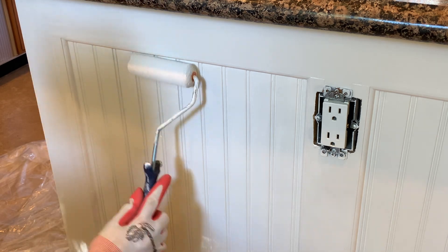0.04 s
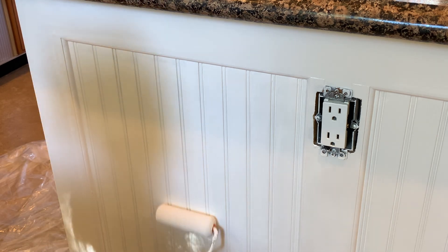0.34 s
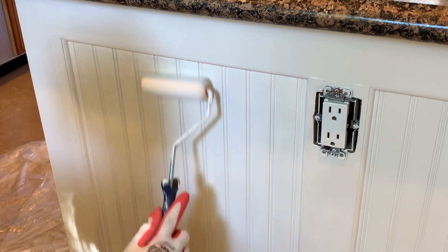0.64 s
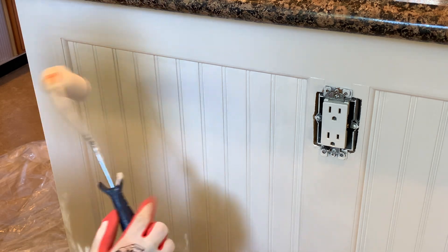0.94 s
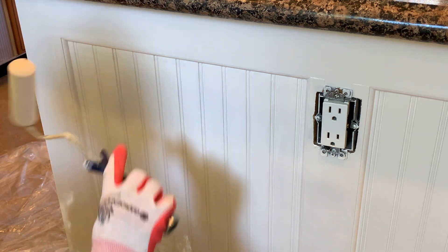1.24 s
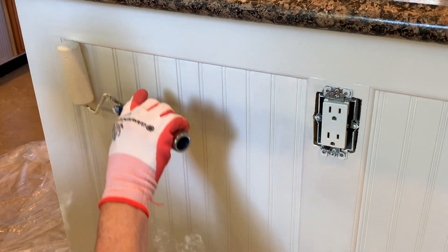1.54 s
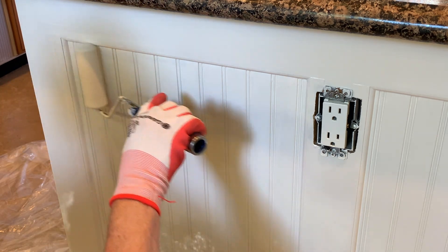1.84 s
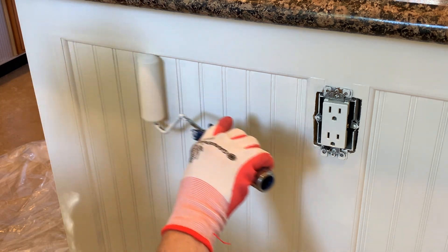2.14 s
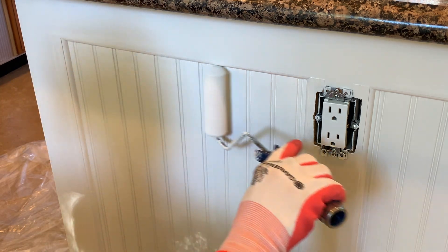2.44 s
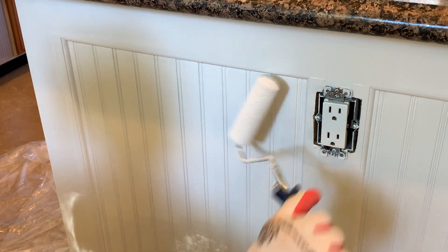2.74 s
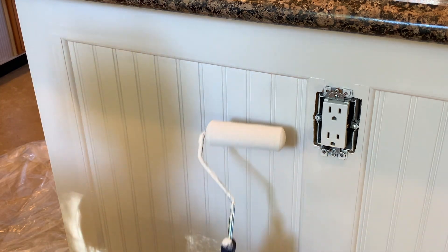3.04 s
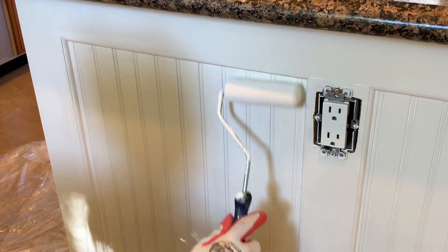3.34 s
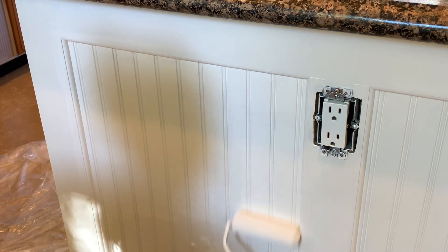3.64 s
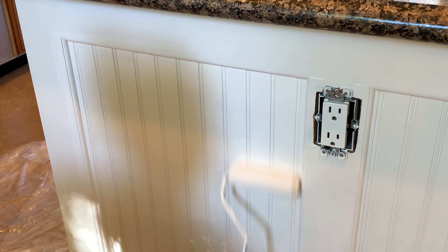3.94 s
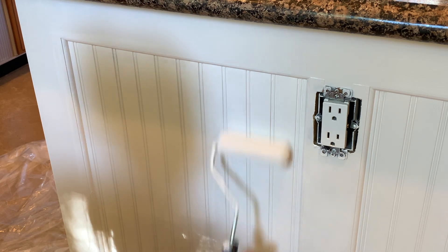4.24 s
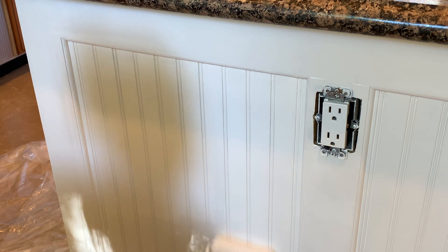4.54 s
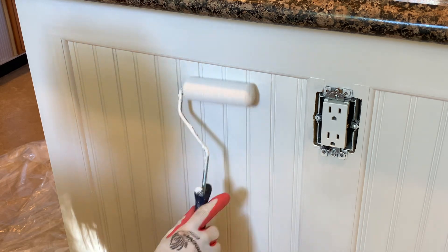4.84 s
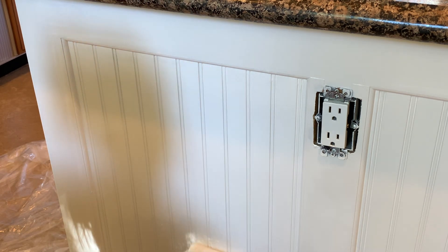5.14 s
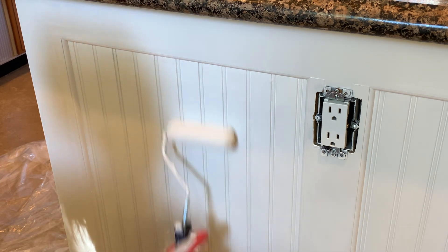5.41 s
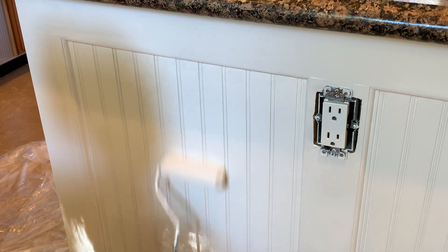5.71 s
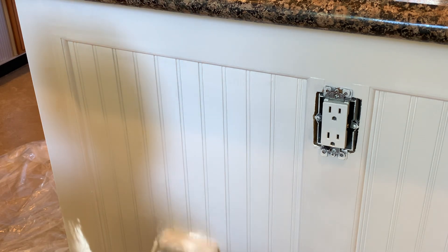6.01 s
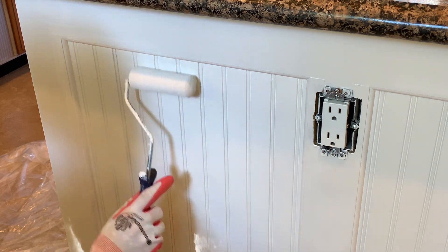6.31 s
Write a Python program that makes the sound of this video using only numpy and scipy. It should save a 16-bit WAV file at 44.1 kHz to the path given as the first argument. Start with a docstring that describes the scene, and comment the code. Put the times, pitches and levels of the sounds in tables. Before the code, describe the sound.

A small paint roller makes a few quick strokes on a wooden panel, the wet paint giving a dense sticky crackle while the hollow wood drums underneath. Lighter, quieter passes follow, with ticks and rubbing from the wire holder and small handle knocks. Then full strokes return in a steady back and forth rhythm. An appliance hums in the room, and the microphone is close.

```python
"""A small paint roller runs up and down a wooden wall panel, makes a few light sideways passes, rolls on.
Threads of wet paint snap behind the nap as a dense sticky crackle. The uneven sleeve drums the hollow
panel, and ticks and rubs on its wire frame; the handle knocks. An appliance hums in the room.
A phone with two ports listens from close by."""
import sys
import numpy as np
from scipy import signal
from scipy.fft import rfft, irfft, next_fast_len
from scipy.io import wavfile
from scipy.ndimage import uniform_filter1d

SR = 44100
rng = np.random.default_rng(int(sys.argv[2]) if len(sys.argv) > 2 else 0)


def transcribe(signal):
    """Save signal, clipped to [-1, 1], as a 16-bit WAV file at the path in sys.argv[1]."""
    frames = np.atleast_2d(signal).T
    limited = np.clip(frames, -1, 1)
    pcm = np.round(limited * 32767).astype(np.int16)
    wavfile.write(sys.argv[1], SR, pcm)


N = 289737
TIME_S = np.arange(N) / SR
FFT_SIZE = next_fast_len(N + SR // 2, True)
FREQS_HZ = np.maximum(np.arange(FFT_SIZE // 2 + 1) * SR / FFT_SIZE, 1)
SIDES = np.array([[1], [-1]])  # left, right

# hollow panel, low and high modes: (frequency [Hz], width [Hz], gain [dB])
BOOM_MODES = [(79.7, 7, -0.5), (98.2, 13, -8.5)]
KNOCK_MODES = [(128.7, 29, -0.5), (172.3, 15.3, -0.5), (207, 18.3, 0.5), (240, 24, -1.5), (306.4, 17, 3),
               (347.6, 24.4, -1), (381.7, 17.4, 2), (580, 128, -11.5)]


def undb(db):
    """Decibels to gain."""
    return 10 ** (np.asarray(db) / 20)


def unit(x):
    """Scale to rms 1."""
    return x / np.sqrt(np.mean(x ** 2))


def over_pitch(table):
    """Table columns interpolated over log frequency."""
    hz, *columns = np.transpose(table)
    return [np.interp(np.log(FREQS_HZ), np.log(np.sort(hz)), c) for c in columns]


def shape(x, response):
    """Filter by a frequency response."""
    return irfft(rfft(x, FFT_SIZE) * response, FFT_SIZE)[..., :N]


def colour(x, spectrum):
    """Filter by a spectrum table; rms 1."""
    return unit(shape(x, undb(over_pitch(spectrum)[0])))


def resonance(hz, width_hz):
    """Response of one damped mode, gain 1 at its centre."""
    return 1 / (1 + 1j * (FREQS_HZ ** 2 - hz ** 2) / (FREQS_HZ * width_hz))


def ring(x, modes):
    """Drive modes of alternating sign."""
    return shape(x, sum((-1) ** k * undb(db) * resonance(hz, width_hz)
                        for k, (hz, width_hz, db) in enumerate(modes)))


def walk(rate_hz):
    """Smooth random drift, rms 1."""
    return unit(shape(rng.standard_normal(N), np.exp(-(FREQS_HZ / rate_hz) ** 2)))


def pops(per_s, spread_db):
    """Random impulses of uneven size; rms 1 at any rate."""
    chance = np.clip(per_s / SR, 1e-4, 1)
    size = undb(spread_db * np.minimum(rng.exponential(size=N), 5))
    return unit((rng.random(N) < chance) * size * rng.choice([-1, 1], N) / np.sqrt(chance))


def sustain(x, window_s):
    """Hold a ringing near rms 1, as under steady drive."""
    return x / np.sqrt(uniform_filter1d(x ** 2, int(window_s * SR)) + 1e-9)


def level_db(power, rest_db):
    """Level of a power added to a resting level."""
    return 10 * np.log10(power + undb(rest_db) ** 2)


def stroke_power(starts_s, ends_s, levels_db, exponent, skew=0.93, reversal_s=0.044):
    """Sound power over strokes: speed is a skewed half sine; the sleeve slips on through each reversal."""
    power = np.zeros(N)
    for start_s, end_s, db in zip(starts_s, ends_s, levels_db):
        travel = np.clip((TIME_S - start_s) / (end_s - start_s), 0, 1) ** skew
        speed = np.abs(np.sin(np.pi * travel))
        power += (undb(db) * speed ** exponent) ** 2
    return np.abs(uniform_filter1d(power, int(reversal_s * SR)))


def appliance(mains_hz=118.7, mains_db=-32):
    """Mains tone and wavering motor drones over a dull rush of air."""
    # motor drones: (frequency [Hz], width [Hz], rms level [dB])
    drones = [(107.3, 3.7, -39), (64.5, 2.7, -39), (176.9, 6.6, -38.5), (206.8, 11, -39.5),
              (250.5, 11.4, -45), (364.1, 11.8, -42.5), (492, 10, -54.5), (678, 12, -56)]
    # air rush: (frequency [Hz], gain [dB])
    air_spectrum = [(25, -20), (45, -9), (75, -0.5), (140, -1.5), (195, 3.5), (275, -6.5), (370, -7),
                    (450, -13.5), (700, -19), (1050, -19.5), (1800, -39), (4000, -41), (9000, -50),
                    (16000, -78)]
    mains = np.sqrt(2) * undb(mains_db + 0.54 * walk(1.4)) * np.sin(2 * np.pi * mains_hz * TIME_S)
    motor = sum(undb(db) * unit(shape(rng.standard_normal(N), resonance(hz, width_hz) ** 2))
                for hz, width_hz, db in drones)
    mid, side = (colour(rng.standard_normal(N), air_spectrum) for _ in range(2))
    side = shape(side, np.minimum(0.14 + FREQS_HZ / 1300, .8))
    return mains + motor + undb(-31 + 0.58 * walk(8.7)) * (mid + side * SIDES)


def room(x, t60_s=0.44, near_s=0.0046, far_db=-21, places=9):
    """Direct sound bends round the phone to each port; reflections change as the roller travels."""
    # (frequency [Hz], left phase lead [rad], left minus right [dB], reflected to direct [dB])
    ports = [(100, 0, 0, -15.5), (346, -0.15, -1.5, -9.5), (970, 0.5, 2.5, -2), (2200, 0.5, 2, -2.5),
             (3170, 1.84, 1.5, 0), (4320, .5, -0.5, -3), (5410, 3.5, -3, 3.5), (7320, -0.5, -2, -10.5),
             (8100, -0.5, 2.2, -4), (9630, -2.5, -1.5, -7), (10160, -3, -2, -39), (11630, -4, 2, -38),
             (11630, -4, -1.5, -5), (12900, -6, -0.5, -12), (15700, -5.5, 1, -24)]
    lead_rad, pan_db, wet_db = over_pitch(ports)
    wet = undb(wet_db)
    port_gain = undb(SIDES * pan_db / 2) / np.sqrt(1 + wet ** 2)
    out = shape(x, port_gain * np.exp(.5j * SIDES * lead_rad))
    t = TIME_S[:SR // 3]
    decay = (np.exp(-t / near_s) + undb(far_db) * undb(-60 * t / t60_s)) * (t > .001)
    # one echo pattern per place on the panel, crossfaded at random
    weights = np.array([walk(8.3) for _ in range(places)])
    for share in weights / np.linalg.norm(weights, axis=0):
        echoes = rfft(rng.standard_normal((2, len(t))) * decay / np.linalg.norm(decay), FFT_SIZE)
        out += shape(x * share, port_gain * wet * echoes)
    return out


def cracks(events, decay_s, rattle_db, rattle_s, q, gain_db):
    """Noise bursts with a short rattle, each ringing at its own pitch."""
    out, t = np.zeros(N + SR), TIME_S[:SR // 8]
    envelope = np.exp(-t / decay_s) + undb(rattle_db) * np.exp(-t / rattle_s)
    for time_s, db, hz in events:
        burst = rng.standard_normal(len(t)) * envelope
        crack = signal.lfilter(*signal.iirpeak(hz, q, fs=SR), burst)
        start = int(time_s * SR)
        out[start:start + len(t)] += undb(db + gain_db) * crack / np.abs(crack).max()
    return out[:N]


def wire_frame():
    """The frame rings as the sleeve rubs unevenly on it; the sleeve ticks, the handle knocks."""
    # wire modes: (frequency [Hz], width [Hz], gain [dB])
    wire_modes = [(1270, 120, -1), (1600, 280, -3), (1970, 160, -6.5), (2790, 150, 2)]
    # axle rub, roller on its side: (start [s], end [s], level [dB])
    axle_rubs = [(.97, 1.34, -44), (1.98, 2.82, -41.5)]
    # sleeve hits frame, or a big blob lets go: (time [s], relative peak [dB], ring [Hz])
    sleeve_ticks = [(0.1935, -26, 8100), (1.046, -12.5, 7800), (1.053, -12.5, 8470), (1.1752, -20, 7920),
                    (1.281, -18, 8350), (1.6995, -33, 7600), (1.7938, -35, 8600), (2.158, -24, 8170),
                    (2.1654, -20, 8420), (2.6723, -21, 8460), (2.69, -13.5, 7700), (3.3373, -22.5, 6800),
                    (3.3837, -28, 6830), (3.4371, -25, 7140), (4.4574, -3, 8250), (5.1502, -2, 7150),
                    (5.3123, -16, 7930)]
    # roller lifts, lands or is regripped: (time [s], relative peak [dB], ring [Hz])
    handle_knocks = [(0.7991, -18.5, 1730), (0.9838, -34, 1080), (1.0024, -21.5, 2620), (1.1042, -21, 1300),
                     (1.1258, -16.5, 2720), (1.1787, -13.5, 3130), (2.8208, -30, 902),
                     (2.9434, -30.5, 1050), (3.05, -37, 1050)]
    rub_gain = np.sqrt(stroke_power(*np.transpose(axle_rubs), exponent=.4))
    rub = unit(ring(pops(2000, spread_db=0.5), wire_modes)) * rub_gain * undb(3.2 * walk(12))
    ticks = cracks(sleeve_ticks, decay_s=0.001, rattle_db=-11, rattle_s=0.018, q=2.8, gain_db=5.5)
    knocks = cracks(handle_knocks, decay_s=0.0021, rattle_db=-8, rattle_s=0.017, q=1.9, gain_db=3.5)
    return rub + ticks + knocks


def bumps(push_s=0.0017, gain_db=-8):
    """The sleeve crosses a groove or lump and thuds softly on the panel."""
    # (time [s], relative peak [dB])
    crossings = [(0.419, -7), (0.619, -10), (2.19, -24), (2.304, -15), (2.504, -16), (2.746, -14),
                 (3.561, -20), (5.16, -9), (5.881, -4)]
    push = np.exp(-((TIME_S - .004) / push_s) ** 2)
    thud = ring(push, BOOM_MODES + KNOCK_MODES)
    thud /= np.abs(thud).max()
    out = np.zeros(N)
    for time_s, db in crossings:
        start = int(time_s * SR)
        out[start:] += undb(db + gain_db) * thud[:N - start]
    return out


def swell_power(sigma_s=0.029):
    """Extra boom as the heavy side of the sleeve comes round."""
    # (time [s], level [dB])
    swells = [(.34, -16.5), (.435, -16), (.485, -19), (.625, -16), (.715, -16.5), (2.21, -23),
              (2.325, -18.5), (2.515, -21), (2.755, -20), (3.58, -17), (3.65, -20.5), (4.04, -21),
              (4.41, -21), (4.48, -18.5), (4.565, -23), (4.695, -23), (4.785, -16), (5.11, -17),
              (5.185, -13.5), (5.28, -25)]
    return sum((undb(db) * np.exp(-((TIME_S - time_s) / sigma_s) ** 2 / 2)) ** 2 for time_s, db in swells)


def contact(db, loose_db):
    """Vibration gain; falls steeply once the sleeve barely touches."""
    return undb(db) / np.sqrt(1 + undb(loose_db - db) ** 4)


def panel(boom_db, knock_db):
    """The lumpy sleeve shakes the panel: low modes boom, higher ones knock hollowly."""
    radiation = 1 / (1 + (57 / FREQS_HZ) ** 6)  # poor below the lowest mode
    boom = sustain(shape(ring(rng.standard_normal(N), BOOM_MODES), radiation), window_s=0.052)
    drum = sustain(ring(pops(900, spread_db=3), KNOCK_MODES), window_s=0.12)
    sway = undb(-17) * unit(shape(rng.standard_normal(N), resonance(32, 22) ** 2))
    return boom * contact(boom_db - .5, loose_db=-37) + (drum + sway) * contact(knock_db + 2, loose_db=-33)


def paint(snap_db, squelch_db, fibres_db=-44):
    """Paint threads snap, more of them the faster the sleeve turns; the wet nap squelches below."""
    # thick to thin threads: (snap [Hz], width [Hz], size spread [dB], growth with speed [dB/dB])
    thread_kinds = [(4240, 3030, 2, 0.07), (8160, 3560, 3.5, 0), (13300, 6600, 1.5, 0)]
    # snapping threads and wet nap: (frequency [Hz], gain [dB])
    snap_spectrum = [(1500, -26), (3200, -9.5), (4300, -8), (5600, -5), (7000, -0.5), (7700, -1.5),
                     (8600, 0.5), (9600, 2), (11500, -3.5), (13500, -10), (15700, -12.5)]
    squelch_spectrum = [(200, -7.5), (450, -17), (750, -2.5), (1200, -2.5), (1800, 1), (2300, -3),
                        (2850, -0.5), (3500, -2.5), (5000, -3.5), (9000, -8.5), (16000, -55)]
    speed_db = snap_db + 18
    snaps_per_s = 18000 * undb(.25 * speed_db)
    threads = 0
    for hz, width_hz, spread_db, growth in thread_kinds:
        snaps = pops(snaps_per_s / 3, spread_db) * undb(growth * speed_db + 1.33 * walk(30))
        threads += shape(snaps, resonance(hz, width_hz) ** 2)
    # light touch: few threads form, the fibres only swish
    swish_share = 1 / (1 + undb(snap_db - fibres_db))
    crackle = np.sqrt(1 - swish_share) * colour(threads, snap_spectrum)
    swish = np.sqrt(swish_share) * colour(rng.standard_normal(N), snap_spectrum)
    squelch = colour(pops(snaps_per_s * .45, spread_db=1.5), squelch_spectrum)
    flicker = undb(0.94 * walk(36))
    return ((crackle + swish) * undb(snap_db + 1) + squelch * undb(squelch_db + 3.5)) * flicker


def scene():
    """Roller speed drives paint and panel together, in the humming room."""
    # full strokes and light passes:
    # (start [s], end [s], paint snap [dB], nap squelch [dB], panel boom [dB], panel knock [dB])
    strokes = [(-.19, 0.153, -12, -24, -22, -29.5), (.195, .49, -12.5, -26, -31, -26),
               (.485, .815, -14, -25.5, -23.5, -27.5), (0.75, 0.895, -46, -42, -24.5, -32.5),
               (0.948, 1.06, -38, -38, -32, -37), (1.047, 1.223, -28, -32, -37, -39),
               (1.26, 1.33, -32.5, -33.5, -38, -35), (1.837, 2.205, -39.5, -42, -42, -34.5),
               (1.916, 2.012, -31.5, -43, -42, -44), (2.104, 2.697, -27.5, -37.5, -32, -33),
               (2.636, 2.827, -34, -39, -34, -36), (2.893, 3.083, -53, -48, -44, -33.5),
               (3.332, 3.446, -45.5, -50, -35, -32.5), (3.437, 3.56, -41, -36.5, -36, -44),
               (3.475, 3.885, -15, -25, -30, -25), (3.886, 4.238, -17.5, -25, -23.5, -29.5),
               (4.256, 4.611, -15.5, -24, -21.5, -27), (4.61, 4.959, -16.5, -24.5, -25, -29.5),
               (4.982, 5.299, -16, -24, -23, -28), (5.294, 5.667, -15.5, -24.5, -26.5, -29.5),
               (5.688, 6.052, -14.5, -24, -22, -26.5), (6.069, 6.458, -14, -25, -23.5, -27),
               (6.463, 6.75, -17, -27, -35, -33)]
    starts_s, ends_s, snap, squelch, boom, knock = np.transpose(strokes)
    lean_lag_s = .05  # the hand leans in after the roller starts
    # rest_db: the sleeve creeps between strokes
    snap_db = level_db(stroke_power(starts_s, ends_s, snap, exponent=1.04), rest_db=-53)
    snap_db += 1.2 * walk(14)  # patchy paint on the sleeve
    squelch_db = level_db(stroke_power(starts_s, ends_s, squelch, exponent=0.81), rest_db=-58.5)
    boom_power = stroke_power(starts_s + lean_lag_s, ends_s + lean_lag_s, boom, exponent=0.68)
    boom_db = level_db(boom_power + swell_power(), rest_db=-38)
    knock_db = level_db(stroke_power(starts_s, ends_s, knock, exponent=0.68), rest_db=-37)
    roller = paint(snap_db, squelch_db) + panel(boom_db, knock_db) + bumps() + wire_frame()
    return room(roller) + appliance()


def record(dry):
    """The phone clips at full scale and cuts the top."""
    top_hz = 15750
    lowpass = signal.ellip(10, .2, 70, top_hz, fs=SR, output="sos")
    return signal.sosfilt(lowpass, np.clip(dry, -1, 1))


dry = scene()
out = record(dry)
transcribe(out)
```